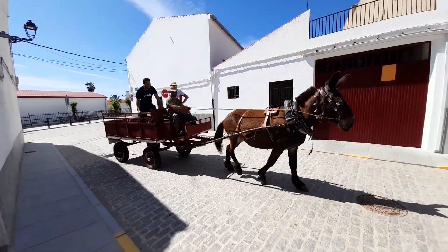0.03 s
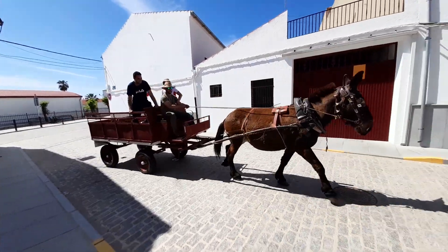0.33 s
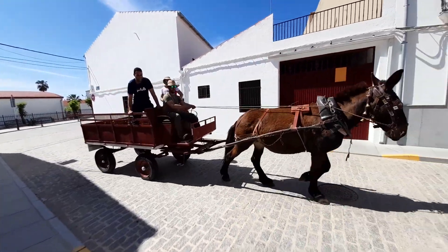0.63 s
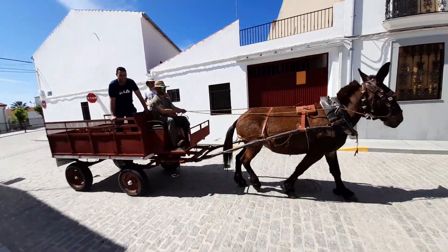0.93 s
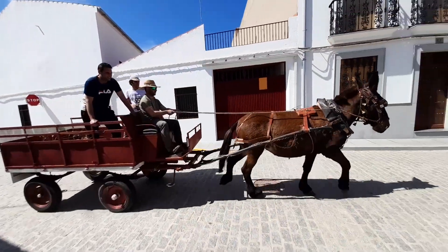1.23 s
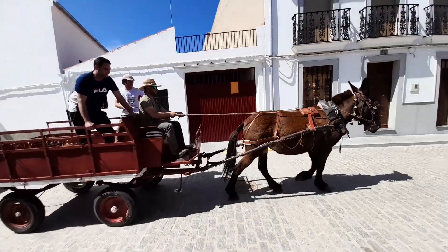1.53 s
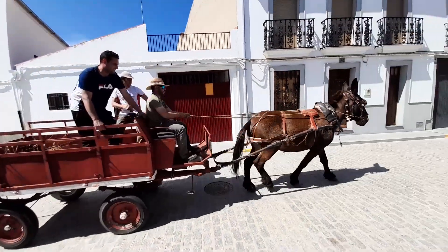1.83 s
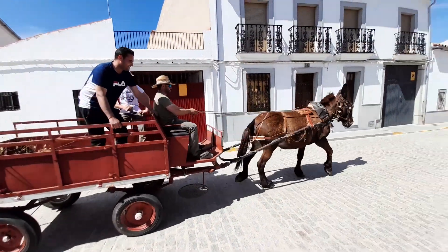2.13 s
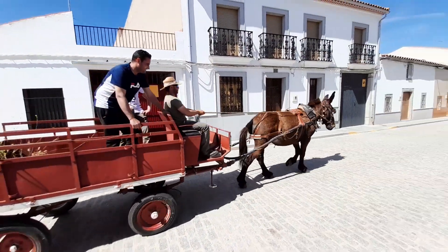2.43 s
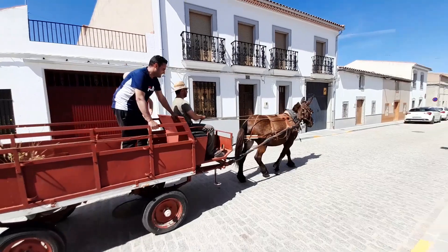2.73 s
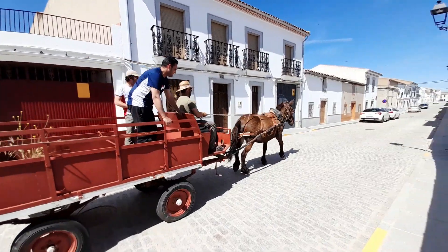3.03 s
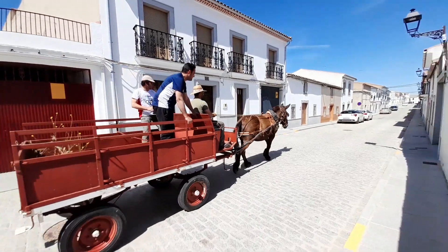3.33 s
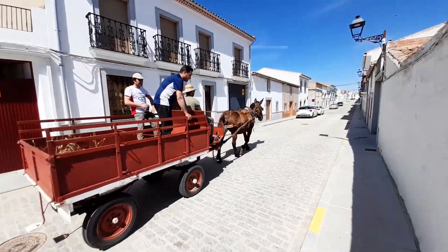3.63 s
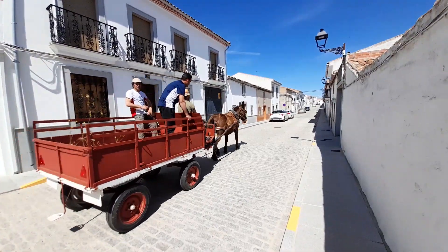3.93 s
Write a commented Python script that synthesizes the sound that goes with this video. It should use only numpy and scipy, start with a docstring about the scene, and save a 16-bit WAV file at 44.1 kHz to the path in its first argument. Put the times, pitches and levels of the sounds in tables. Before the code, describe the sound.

Bright bells shake on the harness of a mule passing nearby on a paved street. Hollow hoof clops, a metal cart's low rumble and tyres hissing on grit run underneath throughout, in stereo with short reflections off the houses.

```python
"""Pellet bells in three sizes jingle on the harness of a mule walking past, 3 m from a stereo microphone.
Loose pellets strike the shells at every step; the ringing beats and sinks slightly in pitch as it passes.
The hooves clop and scuff on the paving. Behind, a steel cart rumbles, booms and rasps over a low hum,
its rubber tyres hissing on grit. The house walls along the street reflect the bells and the steps."""
import sys
import numpy as np
from scipy import signal
from scipy.io import wavfile
from scipy.ndimage import uniform_filter1d

SR = 44100
rng = np.random.default_rng(int(sys.argv[2]) if len(sys.argv) > 2 else 0)


def materialize(psi):
    """Save the field psi as 16-bit PCM at rate SR to the path in sys.argv[1].

    A 1-D psi becomes a single channel; in a 2-D psi each row is a channel.
    """
    bounded = np.clip(np.atleast_2d(psi).T, -1, 1)
    quanta = np.round(bounded * 32767).astype(np.int16)
    wavfile.write(sys.argv[1], SR, quanta)


N = 176400

# pellet strikes on the small bells: t/s, ring level/dB, level of the two high partials/dB
SMALL_STRIKES = [(0.0094, -34.5, -43), (0.197, -25.5, -32.5), (0.4047, -29, -37), (0.5397, -36.5, -37),
                 (0.8085, -34, -32.5), (0.858, -31, -35), (0.9356, -35, -38), (1.01, -39.5, -39.5),
                 (1.2412, -24, -22), (1.2994, -26, -37), (1.6941, -24, -27), (1.8894, -35.5, -36.5),
                 (2.14, -30, -42.5), (2.2587, -26.5, -33), (2.4188, -33, -46), (2.5578, -21, -22),
                 (2.5888, -21, -32.5), (2.845, -27, -35.5), (2.98, -38, -31.5), (3.1279, -25.5, -32),
                 (3.3067, -28.5, -42.5), (3.3991, -34.5, -27.5), (3.56, -34.5, -37), (3.7827, -26, -32.5),
                 (3.8492, -41.5, -29.5), (3.9294, -28, -29)]
# their partials: f/Hz
SMALL_HZ = [4492, 9388, 14812]
# how each partial rings: gain/dB, t60/s, left over right/dB
SMALL_MODES = [(2.5, 0.74, -7), (6.5, 0.43, -3.5), (2, 0.28, 2.5)]
# each bell's detuning/per mille
SMALL_DETUNE = [-4.6, -1.6, 0.6, 3.6]
# how hard the harness shakes: t/s, level/dB
HARNESS_SHAKE = [(0, -32.5), (1.0, -43.5), (1.3, -37), (1.9, -28.5), (2.4, -32.5), (2.6, -33.5), (2.8, -43),
                 (3.0, -30.5), (3.4, -34), (3.6, -39.5), (4, -30.5)]
def small_bells(rolls_per_s=35, roll_db=-11, tick_db=-4.5):
    """Each strike ticks and rings; between strikes the loose pellets keep rolling and touching."""
    touches = rng.uniform(0, N / SR, size=300)
    sounding = rng.random(len(touches)) < rolls_per_s * N / SR / len(touches)
    shake_db = np.interp(touches, *np.transpose(HARNESS_SHAKE))
    touch_db = np.where(sounding, shake_db + roll_db + rng.normal(0, 3.46, len(touches)), -200)
    s, ring_db, top_db = np.r_[SMALL_STRIKES, np.c_[touches, touch_db, touch_db]].T
    ticks = decays(s, top_db + tick_db, t60=.015) * stereo_noise(2000, 18000)
    return ticks + bells(s, [ring_db, top_db, top_db], SMALL_HZ, SMALL_MODES, SMALL_DETUNE, uneven_db=6)


# strikes on the large bells: t/s, level/dB of the middle partial, of the low pair, of the high pair
LARGE_STRIKES = [(0.0742, -46, -42, -40), (0.251, -37, -36, -27.5), (0.6639, -37.5, -41, -37.5),
                 (0.726, -50, -42.5, -29), (1.1159, -37.5, -31.5, -36.5), (1.2015, -33, -49, -26),
                 (1.3594, -44, -29, -60), (1.554, -31.5, -33, -33), (1.6995, -38, -53, -27.5),
                 (2.0872, -37, -38, -39), (2.1316, -29.5, -37, -28), (2.3114, -51, -36.5, -60.5),
                 (2.512, -51, -33.5, -33), (2.5691, -36.5, -40, -27), (2.7402, -51, -33.5, -48),
                 (3.0036, -40, -37.5, -40), (3.43, -52, -41, -39), (3.6214, -43, -48, -38),
                 (3.7269, -43, -41.5, -34), (3.8367, -49, -43, -36)]
# their partials: f/Hz
LARGE_HZ = [3535, 3514, 8330, 11892, 14208]
# how each partial rings: gain/dB, t60/s, left over right/dB
LARGE_MODES = [(-5, 1.7, -3.5), (-6.5, 1.68, -5.5), (9.5, 0.37, -1), (-1, 0.12, -1.5), (8, 0.11, 0)]
# each bell's detuning/per mille
LARGE_DETUNE = [-1.5, 1.1]
def large_bells():
    """Pellets strike the large bells once or twice a step; the low partials ring on."""
    s, middle_db, low_db, top_db = np.transpose(LARGE_STRIKES)
    levels_db = [low_db, low_db, middle_db, top_db, top_db]
    return bells(s, levels_db, LARGE_HZ, LARGE_MODES, LARGE_DETUNE, uneven_db=6.5)


# strikes on the tiny bells: t/s, ring level/dB, level of the highest partial/dB
TINY_STRIKES = [(0.2, -38.5, -37), (0.608, -36.5, -38), (1.1027, -32, -38), (1.419, -34, -50),
                (1.528, -31, -31), (2.022, -32, -37), (2.0744, -37.5, -25.5), (2.3401, -30, -40),
                (2.493, -33, -31), (2.943, -35, -20), (3.192, -32.5, -33), (3.264, -31.5, -34),
                (3.646, -34.5, -42), (3.716, -41, -46)]
# their partials: f/Hz
TINY_HZ = [4524, 4566, 9538, 15125]
# how each partial rings: gain/dB, t60/s, left over right/dB
TINY_MODES = [(4, 0.93, -9.5), (3.5, 0.78, 5), (1, 0.75, -6), (1.5, 0.3, 2)]
# each bell's detuning/per mille
TINY_DETUNE = [-0.9, 0.9]
def tiny_bells():
    """Pellets in the smallest bells add separate, slightly higher pings."""
    s, ring_db, top_db = np.transpose(TINY_STRIKES)
    return bells(s, [ring_db, ring_db, ring_db, top_db], TINY_HZ, TINY_MODES, TINY_DETUNE, uneven_db=7)


WALK_M_PER_S, NEAREST_M, NEAREST_S, SOUND_M_PER_S = 1.6, 3.0, 1.5, 343
def bells(s, levels_db, pitches, modes, detunings, uneven_db, swing_m=.016):
    """Nearly equal bells ring together, beat, swing, and sink in pitch as they pass the microphone."""
    distance = np.hypot(NEAREST_M, WALK_M_PER_S * (np.arange(N) / SR - NEAREST_S))
    # each swinging bell reaches left and right by changing paths
    paths_m = [distance + swing_m * np.array([drift(9), drift(9)]) for _ in detunings]
    out = 0
    for hz, level_db, (db, t60, pan_db) in zip(pitches, levels_db, modes):
        shares = from_db(uneven_db * rng.standard_normal((len(s), len(detunings))))
        shares /= np.linalg.norm(shares, axis=1, keepdims=True)
        partial = np.zeros((2, N))
        for per_mille, share, path_m in zip(detunings, shares.T, paths_m):
            own_hz = hz * (1 + per_mille / 1000)
            hits = pellet_pushes(s, from_db(level_db + db) * share, t60, own_hz)
            tone = shell_ring(hits, t60, own_hz)
            lag = 2 * np.pi * hz * path_m / SOUND_M_PER_S
            partial += tone.real * np.cos(lag) + tone.imag * np.sin(lag)
        out = out + pan(pan_db) * band(partial, hz - 350, hz + 350)
    return out


def pellet_pushes(s, sizes, t60, hz):
    """Each touch meets the ringing bell a quarter cycle off, so its energy adds to what still rings."""
    pushes, ring, last = np.zeros(len(s), complex), 0j, 0
    quarter_turns = rng.choice([-1j, 1j], len(s))
    for k in np.argsort(s):
        at = int(s[k] * SR)
        gap_s = (at - last) / SR
        ring *= from_db(-60 * gap_s / t60) * np.exp(2j * np.pi * hz * gap_s)
        pushes[k] = sizes[k] * quarter_turns[k] * np.exp(1j * np.angle(ring))
        ring, last = ring + pushes[k], at
    return clicks(s, pushes)


def shell_ring(hits, t60, hz, rise_s=.003):
    """A pellet takes a moment to set its bell ringing; then the tone dies away."""
    turn = np.exp(2j * np.pi * hz / SR)
    fall = from_db(-60 / (t60 * SR)) * turn
    rise = np.exp(-1 / (rise_s * SR)) * turn
    return signal.lfilter([fall - rise], np.poly([fall, rise]), hits + 1e-18)


# a hoof lands on the paving: t/s, level/dB of clop, thud, knock, grit
HOOF_FALLS = [(0.004, -36.5, -30, -29, -49), (0.131, -29.5, -56, -58, -33), (0.22, -27.5, -38, -31, -39.5),
              (0.47, -20.5, -31, -19.5, -48), (0.481, -54, -31, -33, -52), (0.514, -52, -26.5, -33, -60),
              (0.651, -28, -22.5, -29, -38.5), (0.954, -26, -32.5, -24.5, -33), (1.105, -27, -34, -34, -30),
              (1.131, -22, -30, -17, -39), (1.149, -29, -26.5, -27, -54), (1.177, -43, -24.5, -36, -55),
              (1.403, -19.5, -22.5, -31.5, -41), (1.425, -31, -24, -34, -41), (1.594, -27, -28.5, -28, -35),
              (1.859, -23.5, -23.5, -22.5, -35), (1.876, -46, -48, -49, -38.5),
              (2.037, -25, -25.5, -30.5, -42), (2.299, -18, -30, -21.5, -36), (2.355, -36, -24, -22.5, -60),
              (2.738, -24.5, -36, -26, -30.5), (2.874, -23.5, -27.5, -28, -33.5),
              (3.165, -20, -19, -27.5, -37), (3.179, -40, -30.5, -34, -39.5), (3.303, -30, -52, -31, -40),
              (3.334, -32, -45, -43, -42), (3.586, -28, -38, -31, -36.5), (3.711, -22, -22, -28.5, -35.5),
              (3.736, -20.5, -23.5, -34.5, -55)]
# the noise bands of those four parts: low f/Hz, high f/Hz, gain/dB, t60/s
HOOF_PARTS = [(771, 1032, -3, 0.077), (80.4, 149, 1.5, 0.12), (220, 481, -2.5, 0.11),
              (1360, 2430, 0, 0.099)]
HOOF_RISE_S, HOOF_PAN_DB = .0012, -.5
def hooves(lead_s=.0019):
    """Each hoof gives a hollow clop, a low thud, a knock and a crunch of grit, the thud lasting longest."""
    s, *levels_db = np.transpose(HOOF_FALLS)
    out = 0
    for (low_hz, high_hz, db, t60), level_db in zip(HOOF_PARTS, levels_db):
        envelope = smoothed(decays(s - lead_s, level_db + db, t60), HOOF_RISE_S)
        out = out + band(envelope * even_noise(low_hz, high_hz), low_hz * .63, high_hz * 1.314)
    return out * pan(HOOF_PAN_DB)


def hoof_knocks(start_hz=399.6, sag_s=.0504, t60=.12, gain_db=-1):
    """The hollow of each hoof rings briefly on a note that sinks as it takes the weight."""
    s, _, _, knock_db, _ = np.transpose(HOOF_FALLS)
    t = np.arange(SR // 5) / SR
    phase = 2 * np.pi * start_hz * sag_s * np.log1p(t / sag_s)
    note = smoothed(from_db(-60 * t / t60), HOOF_RISE_S) * np.sin(phase)
    return signal.fftconvolve(clicks(s, from_db(knock_db + gain_db)), note)[:N] * pan(HOOF_PAN_DB)


# a shoe scrapes: t/s, level/dB
SHOE_SCUFFS = [(0.075, -42), (0.94, -49), (1.1026, -32), (1.882, -35.5), (2.7536, -36.5), (3.679, -41.5)]
def shoe_scuffs(gain_db=9.5):
    """Iron shoes scrape briefly on the stone."""
    s, db = np.transpose(SHOE_SCUFFS)
    return decays(s, db + gain_db, t60=.08) * stereo_noise(4070, 7300) * from_db(2 * drift(200))


# the cart's rolling effort: t/s, level/dB
CART_EFFORT = [(0, -42.5), (0.8, -42), (1.3, -40), (2.0, -39), (2.6, -39), (3.2, -38), (4, -39)]
# spectrum of its rumble: f/Hz, level per Hz/dB
CART_RUMBLE = [(28, -22), (42, 0.5), (65, 5.5), (110, 3.5), (160, -12.5), (205, -9), (320, -7.5),
               (560, -17.5), (900, -17), (1300, -23)]
# resonances of the steel bed: f/Hz, width/Hz, gain/dB
BED_MODES = [(139.7, 18.6, -10), (292.2, 9.3, -9.5), (247, 18.5, -13.5), (346, 43, -14)]
# jolts to the bed: t/s, level/dB
BED_JOLTS = [(1.88, -26.5), (2.31, -24.5), (2.398, -29)]
CART_PAN_DB = -1
def cart(rumble_db=3.5):
    """The paving shakes the cart into a broad rumble and rings its bed, which booms after a jolt."""
    rolling = from_db(in_time(CART_EFFORT))
    s, db = np.transpose(BED_JOLTS)
    booming = signal.lfilter([.005], [1, -.995], decays(s, db, t60=.72))  # softened onset
    out = rolling * from_db(rumble_db) * flickering_noise(CART_RUMBLE, np.geomspace(40, 1300, num=14))
    for hz, width_hz, db in BED_MODES:
        out = out + (rolling + booming) * from_db(db) * even_noise(hz - width_hz / 2, hz + width_hz / 2)
    return out * pan(CART_PAN_DB)


# rasps on the cart: t/s, level/dB
CART_RASPS = [(1.474, -43.5), (2.565, -41), (3.37, -42), (3.45, -40), (3.49, -48), (3.832, -32)]
def cart_rasps():
    """The cart's metal parts give short, dry rasps."""
    s, db = np.transpose(CART_RASPS)
    return smoothed(decays(s, db, t60=.17), rise_s=.0025) * stereo_noise(1640, 2200)


# a hum under the rumble: t/s, level/dB
HUM_LEVEL = [(0, -39.5), (0.7, -42.5), (1.3, -34.5), (1.8, -35.5), (2.4, -34.5), (3.0, -37.5), (3.4, -44.5),
             (4, -39.5)]
def hum(hz=87.8, wander_hz=2.584, waver_db=2, gain_db=5):
    """A low tone wavers in pitch and level."""
    phase = 2 * np.pi * np.cumsum(hz + wander_hz * drift(14)) / SR
    level = from_db(in_time(HUM_LEVEL) + gain_db + waver_db * drift(16))
    return level * np.sin(phase) * pan(CART_PAN_DB)


# tyres on grit and the street's own hiss: f/Hz, level per Hz/dB
GRIT_SPECTRUM = [(600, 4), (1300, -7), (1850, 6.5), (2700, -2.5), (4000, 3.5), (6500, -5), (8000, -6.5),
                 (11000, -15), (16000, -8.5)]
# the course of that hiss: t/s, level/dB
GRIT_LEVEL = [(0, -41), (0.4, -49.5), (1.2, -44), (2.0, -46), (2.8, -46.5), (3.3, -48), (4, -47)]
def tyre_grit(hiss_db=2, crackles_per_s=51, crackle_db=-44.5):
    """Grit hisses and crackles under the tyres, a little to the right."""
    hiss = flickering_noise(GRIT_SPECTRUM, np.geomspace(1000, 16000, num=11))
    hiss *= from_db(in_time(GRIT_LEVEL) + hiss_db)
    grains = rng.random(N) < crackles_per_s / SR
    sizes = from_db(crackle_db + 3.3 * np.minimum(rng.exponential(1, N), 3))
    crackle = dying(grains * sizes, t60=.013) * stereo_noise(1300, 8800)
    return (hiss + crackle) * pan(-2)


def street_echoes(x, t60=.45, first_echo_s=.012):
    """The house fronts scatter reflections back to the microphone."""
    t = np.arange(SR // 2) / SR
    echoes = rng.standard_normal((2, len(t))) * (rng.random((2, len(t))) < .05)
    echoes *= from_db(-60 * t / t60) * (t > first_echo_s)
    return signal.fftconvolve(x, echoes / np.sqrt(np.sum(echoes ** 2) / 2), axes=1)[:, :N]


# how alike left and right are at the microphone: f/Hz, correlation
STEREO_LIKENESS = [(40, 0), (100, 0.89), (350, 0.88), (800, 0.21), (2000, 0), (12000, 0.25)]
def stereo_noise(low_hz, high_hz):
    """A band of noise, as alike on both sides as its pitch allows."""
    mid, side = band(rng.standard_normal((2, N)), low_hz, high_hz)
    alike = at_hz(STEREO_LIKENESS, np.sqrt(low_hz * high_hz))
    return rms_one(np.sqrt(1 + alike) * mid + np.sqrt(1 - alike) * side * [[1], [-1]])


def even_noise(low_hz, high_hz):
    """A band of noise with its swells levelled out."""
    noise = stereo_noise(low_hz, high_hz)
    power = uniform_filter1d(np.mean(noise ** 2, axis=0), int(2 * SR / (high_hz - low_hz)))
    return noise / np.sqrt(power + 1e-9)


def flickering_noise(spectrum, edges_hz, flicker_db=3):
    """Bands of noise that flicker partly together."""
    together, out = drift(45), 0
    for low, high in zip(edges_hz, edges_hz[1:]):
        db = at_hz(spectrum, np.sqrt(low * high)) + flicker_db * (together + drift(20))
        out = out + from_db(db) * np.sqrt(high - low) * stereo_noise(low, high)
    return rms_one(out)


def drift(knots_per_s):
    """A random wander between knots of spread 1."""
    knots = rng.standard_normal(1000)
    return np.interp(np.arange(0, N, 8) / SR * knots_per_s, np.arange(len(knots)), knots).repeat(8)[:N]


def clicks(s, sizes):
    """Impulses at the given times."""
    out = np.zeros(N, np.asarray(sizes).dtype)
    np.add.at(out, np.clip((np.asarray(s) * SR).astype(int), 0, N - 1), sizes)
    return out


def dying(hits, t60):
    """Each impulse dies away."""
    return signal.lfilter([1], [1, -from_db(-60 / (t60 * SR))], hits + 1e-18)


def decays(s, db, t60):
    """An envelope that jumps at the given times and dies away."""
    return dying(clicks(s, from_db(db)), t60)


def smoothed(x, rise_s):
    """Round off sudden rises."""
    keep = np.exp(-1 / (rise_s * SR))
    return signal.lfilter([1 - keep], [1, -keep], x)


def band(x, low_hz, high_hz):
    """Band-pass."""
    return signal.sosfilt(signal.butter(2, [low_hz, high_hz], "band", fs=SR, output="sos"), x + 1e-18)


def in_time(rows):
    """A control curve at every sample."""
    return np.interp(np.arange(N) / SR, *np.transpose(rows))


def at_hz(points, hz):
    """Read a spectrum along log frequency."""
    points_hz, values = np.transpose(points)
    return np.interp(np.log(hz), np.log(points_hz), values)


def pan(db):
    """Gains that put left over right by db."""
    return from_db(np.array([[db], [-db]]) / 2)


def from_db(db):
    """Decibels to gain."""
    return 10 ** (np.asarray(db) / 20)


def rms_one(x):
    """Scale to unit rms."""
    return x / np.sqrt(np.mean(x ** 2) + 1e-20)


def scene(bell_echo_db=-4.5, hoof_echo_db=-9.5):
    """Bells, hooves and cart between the house walls."""
    jingle = tiny_bells() + small_bells() + large_bells()
    steps = hooves() + hoof_knocks() + shoe_scuffs()
    rolling = cart() + cart_rasps() + hum() + tyre_grit()
    echoes = street_echoes(from_db(bell_echo_db) * jingle + from_db(hoof_echo_db) * steps)
    return jingle + steps + rolling + echoes


def record(dry, cutoff_hz=16000):
    """The top of the microphone's signal is cut steeply."""
    return signal.sosfilt(signal.ellip(12, .1, 90, cutoff_hz, fs=SR, output="sos"), dry)


dry = scene()
out = record(dry)
materialize(out)
```